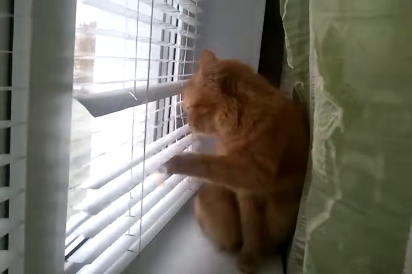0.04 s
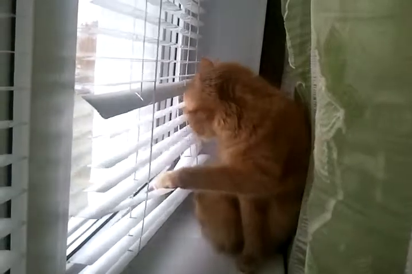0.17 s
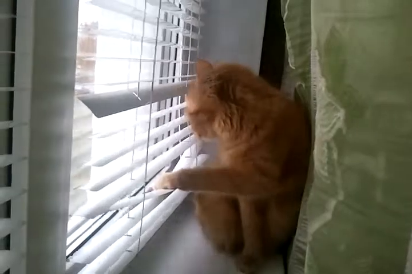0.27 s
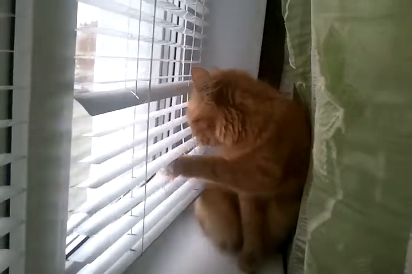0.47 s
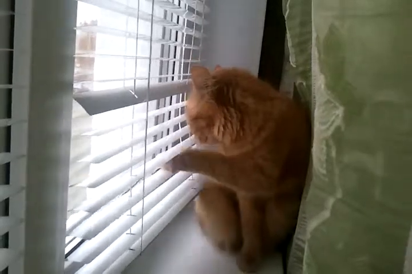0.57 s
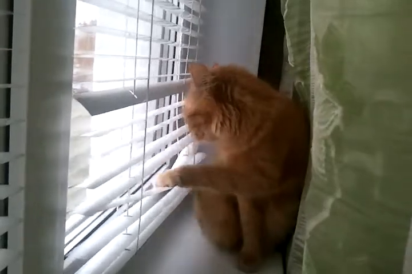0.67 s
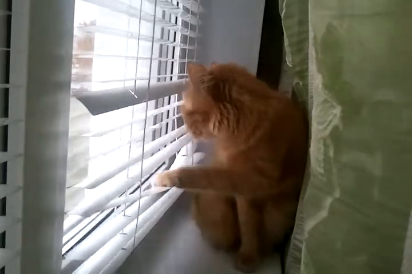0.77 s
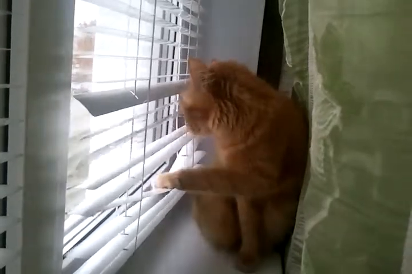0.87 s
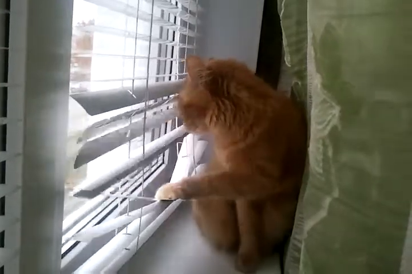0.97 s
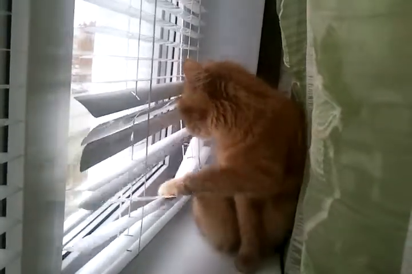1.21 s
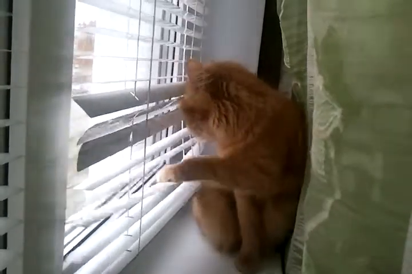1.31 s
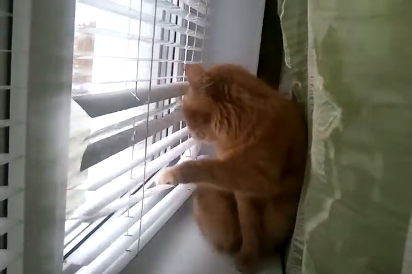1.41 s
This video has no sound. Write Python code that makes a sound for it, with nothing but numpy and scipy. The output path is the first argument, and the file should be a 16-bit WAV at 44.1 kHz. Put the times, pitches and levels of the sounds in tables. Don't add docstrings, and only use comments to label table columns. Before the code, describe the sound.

Plastic blind slats clack and rattle under a cat's paw, with two sharp slaps indoors

```python
import sys
import numpy as np
from scipy import signal
from scipy.fft import rfft, irfft
from scipy.io import wavfile
from scipy.ndimage import uniform_filter1d

SR = 44100
rng = np.random.default_rng(int(sys.argv[2]) if len(sys.argv) > 2 else 0)


def convert_level_to_amplitude(level_db):
    exponent = np.asarray(level_db, float) / 20
    return 10 ** exponent


def inscribe(sig):
    pcm = np.round(np.clip(np.atleast_2d(sig).T, -1, 1) * 32767)
    wavfile.write(sys.argv[1], SR, pcm.astype(np.int16))


N = 63945
LEN = SR // 3


def unit(x):
    return x / np.sqrt(np.mean(x ** 2) + 1e-20)


def along(points, hz):
    f, value = np.transpose(points)
    return np.interp(np.log(hz + 1), np.log(f + 1), value)


def noise(size, gain):
    spectrum = rfft(rng.standard_normal(size))
    return unit(irfft(spectrum * gain(np.fft.rfftfreq(size, 1 / SR)), size))


def resonance(hz, centre_hz, width_hz):
    return 1 / (1 + ((hz - centre_hz) / width_hz) ** 2)


def fade(t60):
    return convert_level_to_amplitude(-60 * np.arange(LEN) / SR / t60)


def add(track, s, x):
    at = round(s * SR)
    track[at:at + len(x)] += x


def rings(modes):
    detune, scatter_db = .002, 5
    beat_hz, beat_depth = 36.7, 0.43
    hz, db, t60 = np.transpose(modes)[..., None]
    a, b = rng.standard_normal((len(modes), 2)).T[..., None]
    t = np.arange(LEN * 2 // 3, dtype=np.float32) / SR
    beat = 1 + beat_depth * np.cos(2 * np.pi * beat_hz * (.5 + abs(a * b)) * t)
    level = convert_level_to_amplitude(db + scatter_db * np.tanh(a) - 60 * t / t60)
    ring = level * beat * np.sin(2 * np.pi * hz * (1 + detune * b) * t)
    end_fade = np.minimum(1, 20 * (t[-1] - t))
    return np.pad(ring.sum(axis=0) * end_fade, (0, LEN - len(t)))


def touches(chatter_s, count=6):
    uneven_db, loss_db = 10, 10
    draw = rng.random((count, 2))
    k = np.arange(count)
    when = chatter_s * (k + draw[:, 0] * (k > 0)) / count
    db = uneven_db * (2 * draw[:, 1] - 1) - loss_db * k / count
    out = np.zeros(SR // 20)
    np.add.at(out, (when * SR).astype(int), convert_level_to_amplitude(db) ** 2)
    return out / out.sum()


# (frequency [Hz], density [dB per Hz])
SLAT_COLOUR = [(400, -24.5), (900, -23.5), (2300, -28.5), (4200, -22), (6200, -1), (9200, -3),
               (14000, -1.5), (15400, -18)]
# (frequency [Hz], level [dB])
BODY_COLOUR = [(300, -22), (700, -2), (1150, 5), (1600, -8.5), (2250, 3.5), (2900, -2), (4000, -10),
               (6000, -8)]
# (frequency [Hz], level [dB], t60 [s])
HIGH_RINGS = [(5270, -24, 0.098), (6264, -23, .07), (6600, -38, .08), (6710, -21, 0.028),
              (6830, -12.5, 0.03), (7440, -23, 0.063), (7646, -24.5, 0.092), (8080, -26, .07),
              (8710, -16, 0.045), (9214, -11.5, 0.056), (10300, -36, 0.094), (10700, -21, 0.11)]
# (frequency [Hz], level [dB], t60 [s])
BENDS = [(1863, -46, 0.1), (2162, -36.5, 0.25), (2494, -35, 0.18), (2883, -36.5, 0.04), (2990, -38, 0.064),
         (3234, -37, 0.083), (3604, -39.5, 0.12), (4036, -37, 0.086), (4460, -34.5, 0.18),
         (4855, -33.5, .18), (5380, -42, 0.13), (5490, -47, 0.085)]


def contact(centre_hz, body_db, chatter_s):
    rise_s = 0.0004
    snap_db, snap_t60, fast_t60 = -1, .007, 0.032
    slow_db, slow_t60 = -11.5, 0.1
    knock_db, knock_t60 = -27, 0.099
    crack_db, crack_t60 = -21, 0.0052
    ring_db = -2
    hits = touches(chatter_s)
    rise = 1 - np.exp(-np.arange(LEN) / SR / rise_s)

    def lift(hz):
        octaves = np.log2((hz + 1) / centre_hz)
        return 7 * np.exp(-(octaves / 0.62) ** 2) - 11 * np.maximum(octaves, 0)

    def struck(t60):
        return np.sqrt(abs(signal.fftconvolve((rise * fade(t60)) ** 2, hits)[:LEN]))

    def high():
        return noise(LEN, lambda hz: convert_level_to_amplitude(along(SLAT_COLOUR, hz) + lift(hz)))

    def bent(hz):
        return 1 + sum(1.1 * resonance(hz, c, 95) for c, _, _ in BENDS)

    def dull():
        return noise(LEN, lambda hz: convert_level_to_amplitude(along(BODY_COLOUR, hz)) * bent(hz))

    dense = high() * np.hypot(struck(fast_t60), convert_level_to_amplitude(snap_db) * struck(snap_t60))
    dense += convert_level_to_amplitude(slow_db) * high() * struck(slow_t60)
    knock = convert_level_to_amplitude(knock_db) * dull() * struck(knock_t60)
    crack = convert_level_to_amplitude(crack_db) * dull() * struck(crack_t60)
    body = convert_level_to_amplitude(body_db) * (knock + crack + rise * rings(BENDS))
    lasting = rings([(hz, db + lift(hz), t60) for hz, db, t60 in HIGH_RINGS])
    return dense + body + convert_level_to_amplitude(ring_db) * rise * lasting


# (time [s], peak level [dB], centre [Hz], body level [dB], chatter [s])
CLACKS = [(.0119, -29, 7100, 10.5, 0.0059), (0.1828, -34.5, 6660, 12, 0.0055),
          (0.2147, -8, 8100, 1.5, 0.0023), (0.2798, -22.5, 7350, 8, 0.0021),
          (0.575, -30, 6000, 13.5, 0.0021), (0.622, -31, 8700, 1, 0.0087), (0.676, -32.5, 7360, 5, 0.0029),
          (0.7603, -11, 9170, 0.5, 0.00097), (0.8336, -21, 9300, 4, 0.0026),
          (1.0314, -33, 6600, 13, 0.0015), (1.0539, -27, 10400, 6, 0.0017),
          (1.1069, -36.5, 9700, -18, 0.007), (1.3028, -48, 5760, 9, 0.0067),
          (1.3779, -29, 8550, -1.5, 0.00064)]


def clacks():
    out = np.zeros(N + SR)
    for s, db, hz, body_db, chatter_s in CLACKS:
        add(out, s, convert_level_to_amplitude(db - 10.5) * contact(hz, body_db, chatter_s))
    return out[:N]


# (time [s], peak level [dB], centre [Hz], body level [dB])
TICKS = [(0.018, -47, 8350, 13), (0.111, -37, 7240, -3), (0.135, -40.5, 7000, 12),
         (0.1897, -34.5, 7000, -11), (0.218, -37, 8600, -11), (0.2766, -45, 6770, -13),
         (.288, -30, 7100, 8.5), (0.577, -28.5, 6800, -22), (0.5995, -42.5, 7950, 9),
         (.6274, -35.5, 8400, 6), (0.6311, -36, 8260, 6), (0.735, -44.5, 6500, 12),
         (0.741, -42.5, 7400, 15), (0.7656, -20, 7440, -9), (0.7707, -23, 6600, 11.5),
         (0.8297, -29.5, 8300, 12.5), (0.8383, -27, 7150, 7), (.8574, -34, 7200, 12.5),
         (.868, -39, 7000, 5), (1.015, -49, 8900, 0), (1.0332, -52, 7050, 0), (1.039, -34, 6600, -10),
         (1.06, -35.5, 9200, 12.5), (1.0634, -32.5, 6900, -14), (1.07, -34.5, 8640, -17),
         (1.0754, -39, 7200, 14.5), (1.091, -63, 7000, 12), (1.109, -40, 8000, 6), (1.2, -53, 5460, 22.5),
         (1.279, -46, 9500, -4), (1.348, -41, 7940, -2), (1.44, -41, 7200, 8)]


def ticks():
    out = np.zeros(N + SR)
    for s, db, hz, body_db in TICKS:
        add(out, s, convert_level_to_amplitude(db - 11.0) * contact(hz, body_db, chatter_s=0.00096))
    return out[:N]


# (time [s], level [dB])
TINGS = [
    (0, -55),
    (.225, -70),
    (.185, -63.5),
    (.29, -48.5),
    (.58, -63),
    (.765, -56),
    (.845, -55.5),
    (1.035, -55),
    (1.303, -53.5),
]
# (frequency [Hz], level [dB], t60 [s])
TING_MODES = [(2150, -13.5, .1), (3250, -17, 0.083), (3605, -12, 0.2), (4545, -13, 0.12), (5297, -7, 0.14),
              (5720, 1.5, 0.18)]


def tings():
    out = np.zeros(N + SR)
    for s, db in TINGS:
        add(out, s, convert_level_to_amplitude(db) * rings(TING_MODES))
    return out[:N]


# (time [s], thud level [dB], low ring level [dB], thud centre [Hz])
PUSHES = [(0, -56.5, -62, 660), (0.014, -42, -59, 1690), (0.091, -87, -71, 900), (.183, -47, -62, 1800),
          (0.231, -46, -58.5, 2310), (0.577, -45.5, -61, 1500), (.734, -49.5, -66.5, 1870),
          (0.763, -68, -66.5, 2580), (0.813, -42.5, -68.5, 1960), (1.04, -65, -67, 2320),
          (1.303, -57, -79, 2670), (1.389, -75, -67, 1240)]
# (frequency [Hz], level [dB], t60 [s])
SILL_MODES = [(446.4, -9.5, .15), (624, -5.5, 0.13), (731, -6.5, 0.099), (890, -15, .1)]


def pushes():
    ring_hz, ring_width_hz, ring_t60 = 1124, 28, 0.4
    thud_octaves, thud_t60 = 0.65, 0.069
    out = np.zeros(N + SR)
    for s, db, ring_db, centre_hz in PUSHES:
        tone = np.sin(2 * np.pi * ring_hz * (s + np.arange(LEN) / SR))
        low = 0.55 * noise(LEN, lambda hz: resonance(hz, ring_hz, ring_width_hz)) + tone
        thud = noise(LEN, lambda hz: 1 / (1 + (np.log2((hz + 1) / centre_hz) / thud_octaves) ** 4))
        add(out, s, convert_level_to_amplitude(db - 7.0) * thud * fade(thud_t60))
        add(out, s, convert_level_to_amplitude(ring_db) * low * fade(ring_t60))
        add(out, s, convert_level_to_amplitude(db - 11) * rings(SILL_MODES))
    return out[:N]


# (time [s], level [dB])
SLIDE = [(0, -59.5), (.1, -57.5), (.17, -59), (0.302, -51.5), (.39, -75), (.5, -62.5), (.57, -68),
         (0.617, -49.5), (.66, -60.5), (.75, -69), (.9, -61), (0.999, -67), (1.041, -50), (1.075, -53),
         (1.13, -58), (1.19, -73.5), (1.3, -59), (1.355, -56), (1.45, -62.5)]
# (frequency [Hz], density [dB per Hz])
RUB_COLOUR = [(880, -15.5), (1500, -9.5), (2050, -18), (4210, -20.5), (8010, -3), (10900, -13),
              (12400, -4.5), (14700, -32), (15400, -56)]


def slide():
    grains_per_s, grain_db, smooth = 1200, 1.8, 1.1
    draw = rng.random((2, N))
    grains = (draw[0] < grains_per_s / SR) * convert_level_to_amplitude(-grain_db * np.log(draw[1] + .03))
    energy = signal.fftconvolve(grains ** 2, fade(0.0026) ** 2)[:N]
    rough = unit(np.sqrt(abs(energy))) + smooth

    def peaks(hz):
        return 1 + sum(2.1 * resonance(hz, c, 40) for c, _, _ in HIGH_RINGS + BENDS)

    rub = noise(N, lambda hz: convert_level_to_amplitude(along(RUB_COLOUR, hz)) * peaks(hz))
    s, db = np.transpose(SLIDE)
    return convert_level_to_amplitude(np.interp(np.arange(N) / SR, s, db)) * unit(rough * rub)


# (frequency [Hz], t60 [s])
ROOM_DECAY = [(300, 0.81), (2000, 0.48), (12000, 0.13)]


def room(x):
    hz, t, z = signal.stft(rng.standard_normal(LEN), SR, nperseg=256)
    decay = convert_level_to_amplitude(-60 * t / along(ROOM_DECAY, hz)[:, None])
    tail = signal.istft(z * decay, SR, nperseg=256)[1]
    delayed = np.pad(x, (300, 0))
    return signal.fftconvolve(delayed, tail / np.linalg.norm(tail))[:N]


# (frequency [Hz], density [dB per Hz])
AIR_COLOUR = [(20, -1.5), (75, -27), (200, -3), (330, -16.5), (600, -13.5), (1500, -26), (4000, -32),
              (9000, -25), (15000, -31)]
# (frequency [Hz], level [dB], width [Hz])
HUM = [(27.8, -66.5, 9.4), (47.2, -70, 12.5), (121.2, -66.5, 10.7), (142.4, -70.5, 6.3),
       (197.4, -65.5, 19.2), (239.5, -68, 50), (260, -75, 31), (482.4, -79.5, 3.2)]


def air():
    out = convert_level_to_amplitude(-58.5 - 5.5) * noise(N, lambda hz: convert_level_to_amplitude(along(AIR_COLOUR, hz)))
    for centre_hz, db, width_hz in HUM:
        out += convert_level_to_amplitude(db) * noise(N, lambda hz: resonance(hz, centre_hz, width_hz))
    return out


def masked(x):
    threshold_db, soft_db, treble_cap_db = -9.5, .8, -83
    hz, _, z = signal.stft(x, SR, nperseg=2048)
    power = abs(z) ** 2 + 1e-20
    treble = power[:, (hz > 5000) & (hz < 12000)].mean(axis=1, keepdims=True)
    band = abs(uniform_filter1d(power, size=7, axis=-2)) + 1e-20
    under_db = 10 * np.log10(band / np.minimum(treble, convert_level_to_amplitude(treble_cap_db) ** 2))
    keep = (1 + np.tanh((under_db - threshold_db) / soft_db)) / 2
    affected = (hz > 2700) & (hz < 4900) | (hz > 14100)
    return signal.istft(z * np.where(affected[:, None], keep, 1), SR, nperseg=2048)[1][:, :N]


def scene():
    blind = clacks() + ticks() + tings() + pushes() + slide()
    return (blind + convert_level_to_amplitude(-14.5) * room(blind) + air())[None]


def low_pass(x):
    return signal.sosfilt(signal.butter(12, 15540, fs=SR, output="sos"), x)


def record(dry):
    top_hz = 14900
    hz = np.fft.rfftfreq(N, 1 / SR)
    heard = irfft(rfft(dry) / np.sqrt(1 + (hz / top_hz) ** 50), N)
    mix = masked(heard)
    return low_pass(mix)


dry = scene()
out = record(dry)
inscribe(out)
```